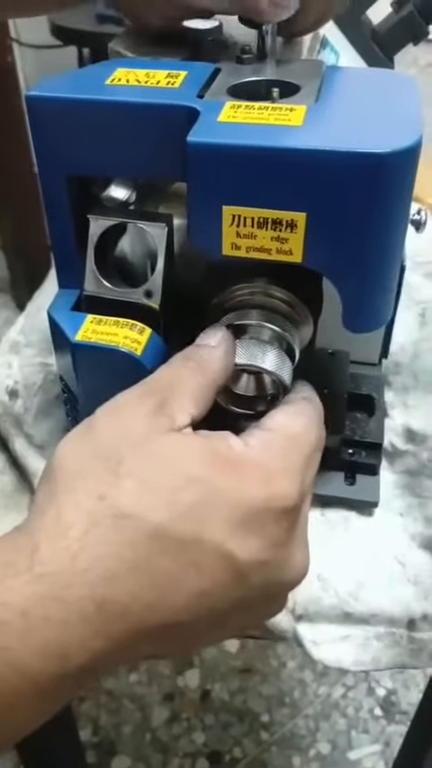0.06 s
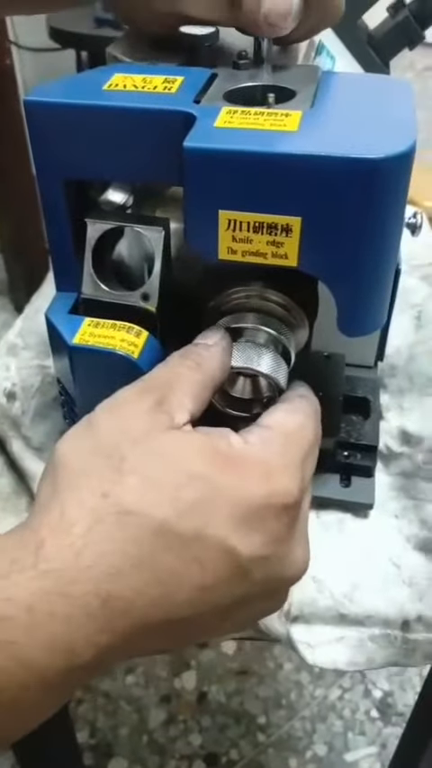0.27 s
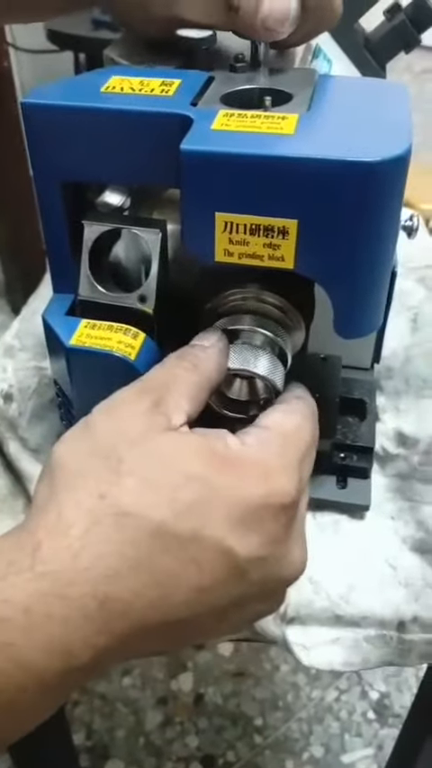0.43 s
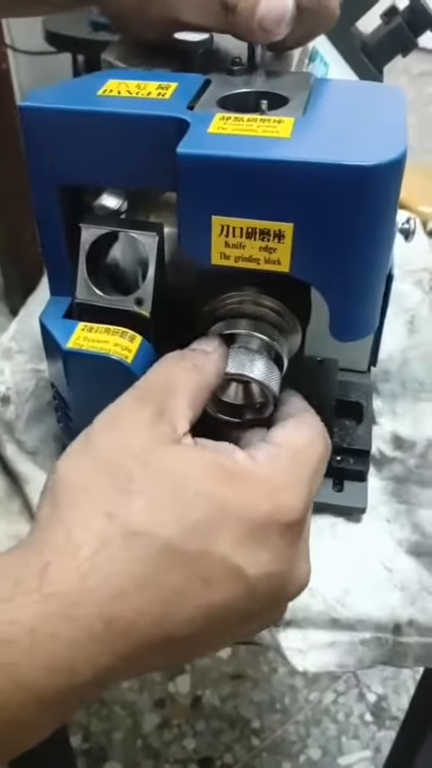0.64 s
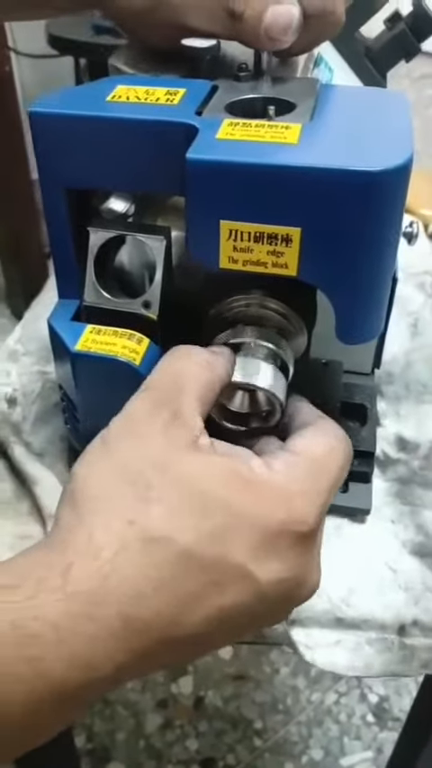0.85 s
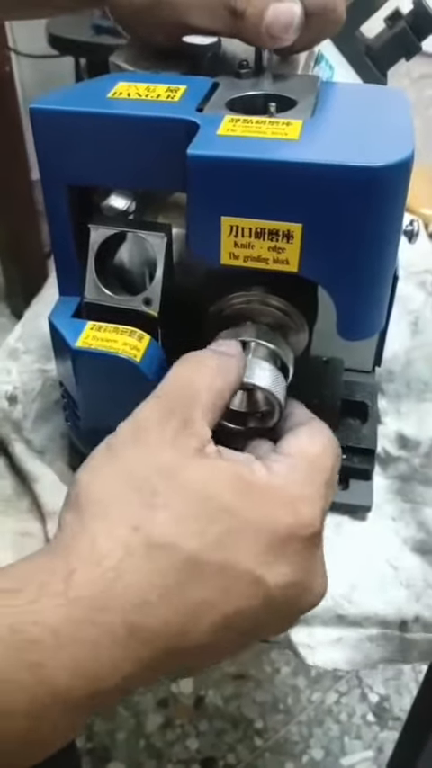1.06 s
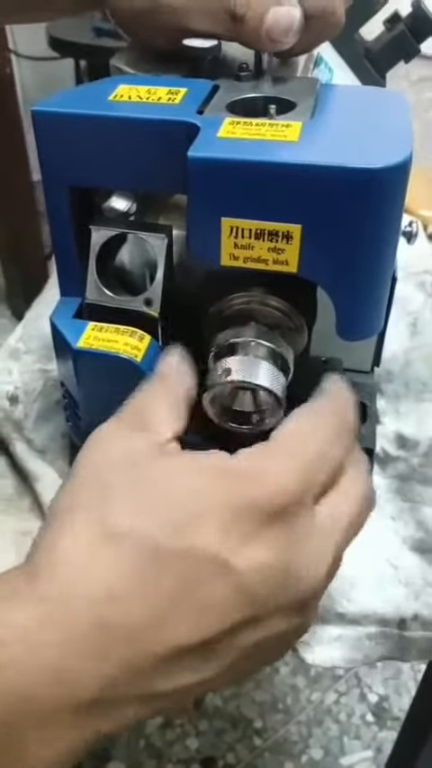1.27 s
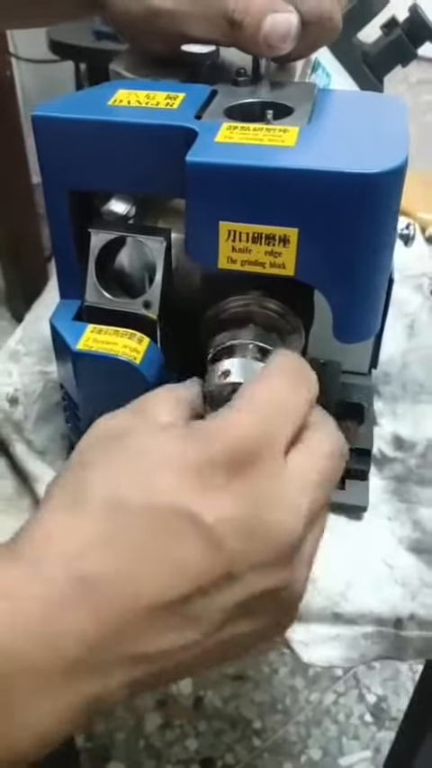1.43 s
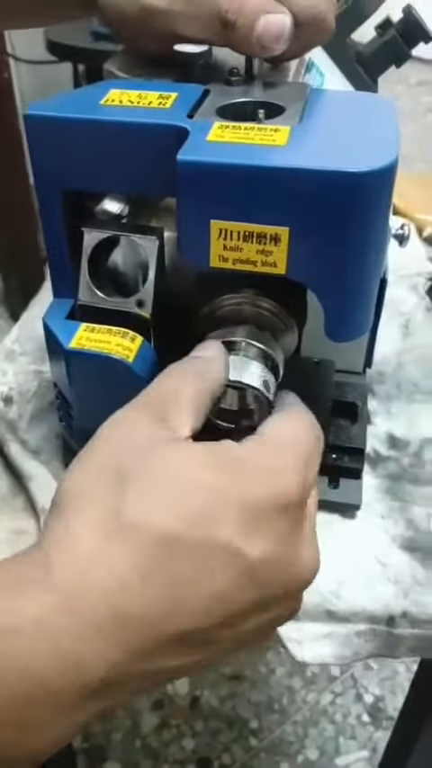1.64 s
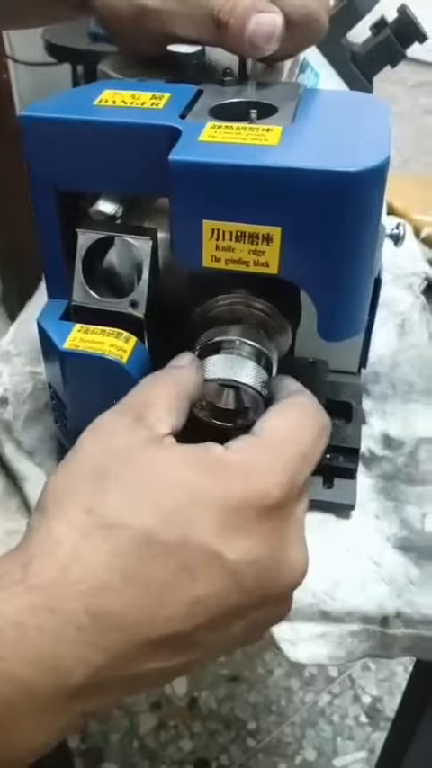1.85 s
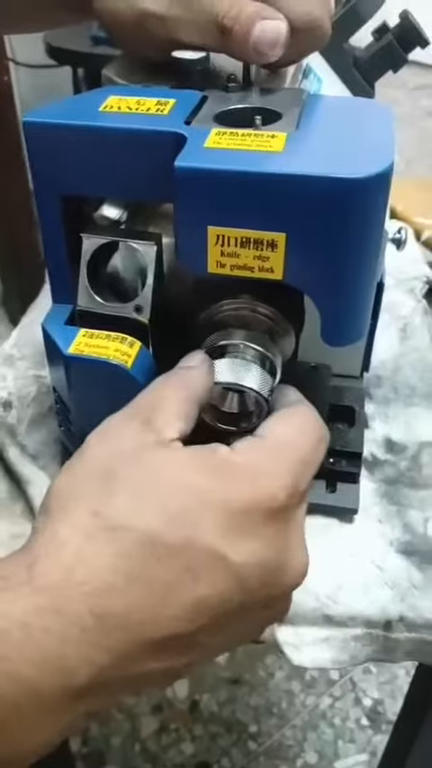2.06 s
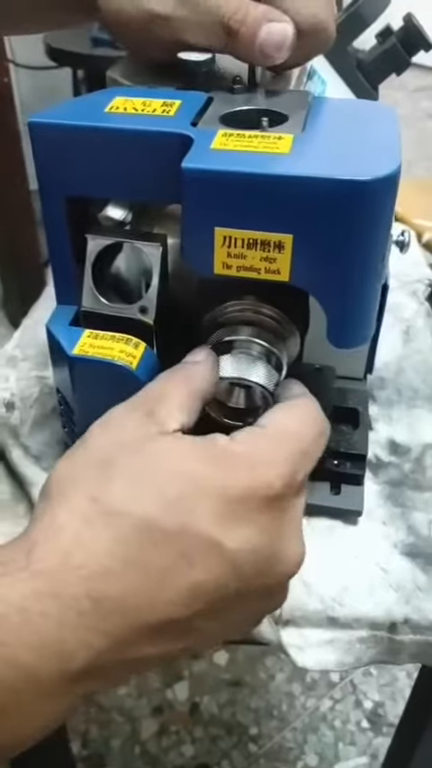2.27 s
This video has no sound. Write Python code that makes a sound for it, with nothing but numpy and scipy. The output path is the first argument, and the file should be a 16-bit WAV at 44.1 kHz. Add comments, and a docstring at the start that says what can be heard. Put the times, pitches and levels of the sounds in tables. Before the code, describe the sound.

A small sharpening machine whirs throughout with a low hum, steady high motor whine and soft airy rush. At about 0.2 seconds a metal cutter touches the wheel: a loud, harsh rasp with a piercing ring, easing into tiny squeals by 0.4 as the motor sags and recovers. Faint scrapes and soft knocks follow around 1.0 to 1.4, a clearer scrape at 1.8, then lighter ones, close in a reverberant workshop.

```python
"""An end mill sharpener hums and whines on a workshop bench; the cutter meets the wheel once, rasping
at every turn and squealing while the speed sags; then come faint scrapes and soft knocks as a hand
lifts, turns and reseats the tool holder. Motor, buzz and ring are tones on multiples of the shaft speed;
rasp, scrapes and air are coloured noise; squeals and knocks are swelling sines. The work echoes in the room."""
import sys
import numpy as np
from scipy import signal
from scipy.fft import rfft, irfft
from scipy.io import wavfile

SR = 44100
rng = np.random.default_rng(int(sys.argv[2]) if len(sys.argv) > 2 else 0)


def pcm_store(signal):
    """Save signal as 16-bit PCM."""
    levels = np.round(np.clip(np.atleast_2d(signal), -1, 1) * 32767)
    wavfile.write(sys.argv[1], SR, levels.astype(np.int16).T)


N = 101429
T = np.arange(N) / SR
HZ = np.fft.rfftfreq(N, 1 / SR)
WAVER_HZ, FUZZ_HZ = 7, 49.27  # slow and fast unsteadiness of the tones

# Shaft speed, sagging during the cut: t/s, speed/(turns/s)
SHAFT_SPEED = [(0, 122.33), (.2, 122.3), (.3, 120.7), (.34, 120.4), (.45, 121.1), (.7, 121.85), (1, 122.15),
               (1.5, 122.25), (2.3, 122.45)]
# Levels of the tones over time, low after the cut and then recovering: t/s, hum/dB, whine/dB, whistle/dB
TONE_LEVELS = [(.2, -1, 0.5, 1), (.36, 5.5, -9.5, 6), (.47, -2.5, -7, 10.5), (.63, -3.5, -4.5, -9.5),
               (.8, -1.5, -3.5, -35), (1, 0, -1, 1.5), (1.28, -1, -2, -26), (1.34, -0.5, -1, 0.5),
               (1.55, 0, -2, -0.5), (1.85, 0.5, 0.5, 2), (2.3, 1, 1.5, 2)]


def amp(db):
    """Decibels to gain."""
    return 10 ** (np.asarray(db) / 20)


def unit(x):
    """Scales to rms 1."""
    return x / np.sqrt(np.mean(abs(x) ** 2) + 1e-20)


def curve(table, order=1):
    """One column of a time table, at every sample."""
    rows = np.transpose(table)
    return np.interp(T, rows[0], rows[order])


def read(table, hz):
    """A spectrum table on a log-frequency axis."""
    f, value = np.transpose(table)
    return np.interp(np.log(hz + 1), np.log(f + 1), value)


def colour(x, db):
    """Filters by a gain per frequency; rms 1 over both channels."""
    return unit(irfft(rfft(x) * amp(db), N))


def pair(same):
    """Two channels of white noise with correlation `same`."""
    left, other = rng.standard_normal((2, N))
    same = np.clip(same, -1, 1)
    return np.array([left, same * left + np.sqrt(1 - same * same) * other])


def drift(hz):
    """Slow complex chance for each channel, rms 1, from random points joined by lines."""
    real, imag = rng.standard_normal((2, 2, 1024))
    points = real + 1j * imag
    return unit(np.array([np.interp(T * hz * 2, np.arange(1024), row) for row in points]))


def tones(table, turns, waver, fuzz, lag, scatter):
    """Wavering tones on shaft multiples; lag/rad delays the right, scatter 0 lines them up into pulses."""
    out = np.zeros((2, N))
    for multiple, left_db, right_db in table:
        unsteady = 1 + waver * drift(WAVER_HZ) + fuzz * drift(FUZZ_HZ)
        cycles = multiple * turns + scatter * rng.random()
        phase = 2 * np.pi * cycles - np.array([[0], [lag]])
        out += amp([[left_db], [right_db]]) * (unsteady * np.exp(1j * phase)).real
    return np.sqrt(2) * out


def motor(turns):
    """Bearing hum, motor whine and wheel whistle, all following the shaft speed."""
    # Each: multiple of shaft speed, left/dB, right/dB, before the levels over time
    bearing_tones = [(3.075, -38, -46), (6.16, -65, -51.5), (11.29, -126, -54.5), (4.08, -58, -82.5),
                     (1.025, -70, -71.5), (13.01, -105, -54.5)]
    motor_tones = [(24.025, -41.5, -40), (36.02, -54.5, -73), (48.1, -56.5, -78), (54, -61, -58.5),
                   (65.64, -56, -67), (67.86, -55.5, -76)]
    whistle_tones = [(61.95, -49, -62.5), (62.95, -54, -71)]
    hum = tones(bearing_tones, turns, waver=.14, fuzz=.17, lag=.072, scatter=.98)
    whine = tones(motor_tones, turns, waver=.06, fuzz=.025, lag=.95, scatter=1)
    whistle = tones(whistle_tones, turns, waver=.18, fuzz=.16, lag=1.1, scatter=1)
    hum_gain, whine_gain, whistle_gain = (amp(curve(TONE_LEVELS, order=k)) for k in (1, 2, 3))
    return hum * hum_gain + whine * whine_gain + whistle * whistle_gain


def fine_buzz(turns):
    """Weak shaft multiples at random phases and levels, sharing seven unsteady envelopes."""
    # Typical level of the multiples, before their scatter: f/Hz, level/dB
    comb_levels = [(600, -77.5), (1600, -99), (2000, -74), (2450, -72), (3600, -102.5), (4700, -71.5),
                   (5400, -70.5), (6700, -64.5), (9300, -68), (10000, -82), (12200, -64.5), (13100, -92),
                   (14700, -80)]
    scatter_db = 4.5
    buzz = np.zeros((2, N))
    wavers = [1 + .3 * drift(WAVER_HZ) + .2 * drift(FUZZ_HZ) for _ in range(7)]
    for k in range(5, 124):
        offset_db = scatter_db * (rng.uniform(-2, 2, (2, 1)) - 1)
        level = amp(read(comb_levels, k * SHAFT_SPEED[0][1]) + offset_db)
        start = np.exp(2j * np.pi * rng.random((2, 1)))
        tone = start * wavers[k % len(wavers)] * np.exp(2j * np.pi * k * turns)
        buzz += level * tone.real
    return np.sqrt(2) * buzz


def hiss():
    """Faint noise, independent in the two channels, with the spectrum of the buzz."""
    # Relative spectrum: f/Hz, level/dB
    hiss_spectrum = [(600, -77.5), (1600, -99), (2000, -74), (2450, -72), (3600, -102.5), (4700, -71.5),
                     (5400, -70.5), (6700, -64.5), (9300, -68), (10000, -82), (12200, -64.5), (13100, -92),
                     (14700, -80)]
    return amp(-67) * colour(pair(0), read(hiss_spectrum, HZ))


def stirred_air():
    """The rush of air stirred by the wheel: coloured noise with a gently drifting level."""
    # Relative spectrum of the air: f/Hz, density/(dB per Hz)
    air_spectrum = [(25, -6.5), (180, -12), (300, 1.5), (450, 3.5), (600, -7), (900, 3), (1150, -16),
                    (1600, 0), (1950, -26.5), (2350, -8.5), (3100, -16), (3600, -61), (15000, -20.5)]
    level_db = -53.5 + 1.42 * drift(5.89).real[0]
    return amp(level_db) * colour(pair(.28), read(air_spectrum, HZ))


def wheel(turns):
    """Buzz, hiss and air, dipping along with the whine by about a fifth of its dB."""
    return (fine_buzz(turns) + hiss() + stirred_air()) * amp(.21 * curve(TONE_LEVELS, order=2))


def rasp(turns):
    """Grit rasps past the cutter, partly repeating each turn, with strong tones that come and go."""
    # Relative spectrum of the grit: f/Hz, density/(dB per Hz)
    grit_spectrum = [(60, -17.5), (250, -24), (450, -4), (900, 3.5), (1700, -3), (3500, -0.5),
                     (5500, -19.5), (6600, -0.5), (7900, 8.5), (8700, -4.5), (10000, -45), (11500, -14),
                     (15000, -29)]
    # Tones shifting as the contact moves: multiple of shaft speed, left/dB, right/dB, strongest at t/s;
    # levels are before the contact curve
    contact_tones = [(3.004, -28.5, -29.5, 0.24), (5.983, -37.5, -36.5, 0.25), (8.026, -34.5, -29.5, 0.28),
                     (8.98, -34, -37.5, 0.31), (9.97, -36, -47, .33), (12.05, -28.5, -38, 0.257),
                     (13, -35.5, -39, 0.32), (14, -33.5, -49, .265), (15, -35, -41, .28),
                     (17.94, -28, -40.5, 0.24), (20.06, -38, -44, 0.25), (29.2, -38.5, -42, 0.285)]
    same, repeat_share, pulse_depth, tone_half_s = .6, .35, .7, .054
    # One turn's grit pattern, read round and round by shaft angle
    one_turn = signal.resample(pair(same)[:, :360], 4096, axis=1)
    repeating = one_turn[:, (turns % 1 * one_turn.shape[1]).astype(int)]
    grit = np.sqrt(repeat_share) * repeating + np.sqrt(1 - repeat_share) * pair(same)
    grit *= 1 + pulse_depth * np.sin(2 * np.pi * turns)
    out = amp(-28) * amp([[1], [-1]]) * colour(grit, read(grit_spectrum, HZ))
    for *tone, peak in contact_tones:
        nearness = 1 / (1 + ((T - peak) / tone_half_s) ** 2)
        out += tones([tone], turns, waver=.12, fuzz=.24, lag=.7, scatter=.7) * nearness
    return out


def ring(turns):
    """The wheel's high spot strikes the cutter each turn; resonant delays make pulses rise fast and die."""
    # Tones of the ringing cutter: multiple of shaft speed, left/dB, right/dB, before the contact curve
    cutter_tones = [(54.1, -33.5, -46.5), (62, -24, -30), (63.9, -24, -26), (64.2, -21, -29),
                    (64.85, -17, -22), (65.8, -12.5, -20)]
    resonance, half_width = 65.9, .4  # multiples of shaft speed
    channel_lag = np.array([[0], [.9]])  # rad
    out = np.zeros((2, N))
    for multiple, left_db, right_db in cutter_tones:
        delay = np.arctan((multiple - resonance) / half_width) + channel_lag
        phase = 2 * np.pi * multiple * turns - delay
        tone = (1 + .07 * drift(FUZZ_HZ)) * np.exp(1j * phase)
        out += np.sqrt(2) * amp([[left_db], [right_db]]) * tone.real
    return out


def cut(turns):
    """The contact of cutter and wheel shapes the rasp and the ring separately."""
    # The contact as it comes and goes: t/s, rasp level/dB, ring level/dB
    contact = [(.195, -50, -43), (.208, -19, -12), (.22, -3, -3), (.25, 2, -7.5), (.275, 0.5, -2),
               (.315, -1, 2.5), (.334, 0, -11.5), (.36, -16.5, -27), (.42, -25, -27), (.48, -59, -51)]
    turns = turns + .3  # angle of the wheel's high spot, in turns
    return rasp(turns) * amp(curve(contact, order=1)) + ring(turns) * amp(curve(contact, order=2))


def swell(peak, half, hz, db):
    """A sine that swells and dies in a bell-shaped envelope."""
    envelope = np.exp(-((T - peak) / half) ** 2)
    return np.sqrt(2) * amp(db) * envelope * np.sin(2 * np.pi * hz * T)


def squeals():
    """The cutter sings at its own pitches as the pressure eases."""
    # Squeals as the cutter lets go: peak t/s, half length/s, f/Hz, level/dB before the channel balance
    letting_go = [(0.345, 0.0096, 7460, -20), (0.364, 0.013, 7925, -22.5), (0.408, 0.008, 7930, -28.5),
                  (0.423, 0.01, 7460, -32)]
    return amp([[1.5], [-1.5]]) * sum(swell(*row) for row in letting_go)


def scrapes():
    """Grainy noise bands rise quickly and fade: cutter leaving the wheel, then holder sliding in its seat."""
    # Each scrape: start t/s, decay/s, centre f/Hz, width/octaves, level/dB before grain and envelope
    slides = [(0.354, 0.044, 1260, 0.78, -35.5), (0.964, 0.054, 2160, 0.24, -45.5),
              (0.971, 0.24, 873, 0.23, -47), (1.29, 0.23, 2313, 0.13, -55.5),
              (1.431, 0.073, 259, 0.57, -52.5), (1.799, 0.035, 1810, 0.49, -34),
              (1.806, .025, 666, 0.9, -41.5), (1.931, 0.046, 1624, 0.087, -44.5),
              (2.073, 0.068, 770, 0.51, -47.5), (2.238, 0.052, 840, 0.55, -45)]
    rise_s, grain_db, skirt_db = .005, 3.5, 32
    out = np.zeros((2, N))
    for start, decay, hz, octaves, db in slides:
        age = np.maximum(T - start, 0)
        envelope = np.minimum(age / rise_s, 1) * np.exp(-age / decay)
        grains = pair(.18) * amp(grain_db * drift(200).real[0])
        distance = np.log2((HZ + 1) / hz) / octaves
        band_db = -skirt_db * np.log10(1 + distance ** 2)
        out += amp(db) * colour(grains, band_db) * envelope
    return out


def knocks():
    """Soft knocks of the hand on the housing: brief low swells."""
    # Each knock: peak t/s, level/dB
    touches = [(.39, -58), (1.061, -56), (1.235, -51), (2.09, -48.5)]
    return sum(swell(peak, half=.021, hz=119.5, db=db) for peak, db in touches)


def workshop(x):
    """A diffuse noise tail, each band dying at its own speed."""
    # Decay of the workshop: f/Hz, t60/s
    decay_times = [(1500, 0.44), (8000, 0.49), (15000, 0.1)]
    hz, t, bands = signal.stft(rng.standard_normal((2, SR)), SR, nperseg=256)
    decay = amp(-60 * t / read(decay_times, hz)[:, None])
    tail = signal.istft(bands * decay, SR, nperseg=256)[1]
    return signal.fftconvolve(x, tail / np.linalg.norm(tail[0]), axes=1)[:, :N]


def scene():
    """The running machine, with the cut and the handling echoing in the room."""
    turns = np.cumsum(curve(SHAFT_SPEED)) / SR
    work = cut(turns) + squeals() + scrapes() + knocks()
    return motor(turns) + wheel(turns) + work + amp(-13) * workshop(work)


def record(dry):
    """The recorder's band limit: a steep low-pass filter."""
    low_pass = signal.firwin(511, 15450, window=("kaiser", 9), fs=SR)
    return signal.oaconvolve(dry, low_pass[None], "same")


dry = scene()
out = record(dry)
pcm_store(out)
```